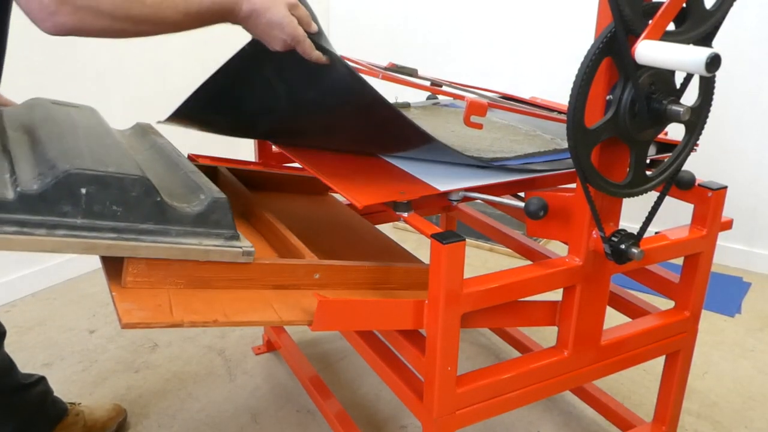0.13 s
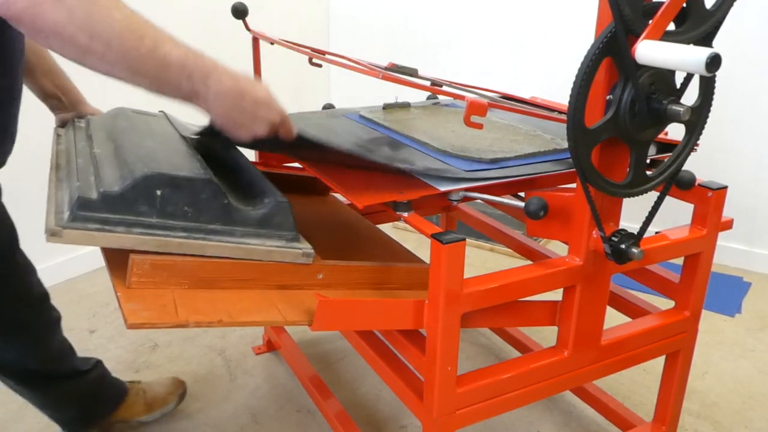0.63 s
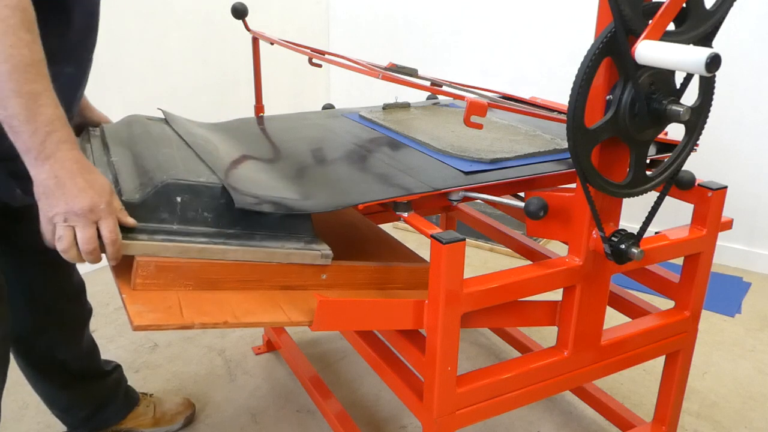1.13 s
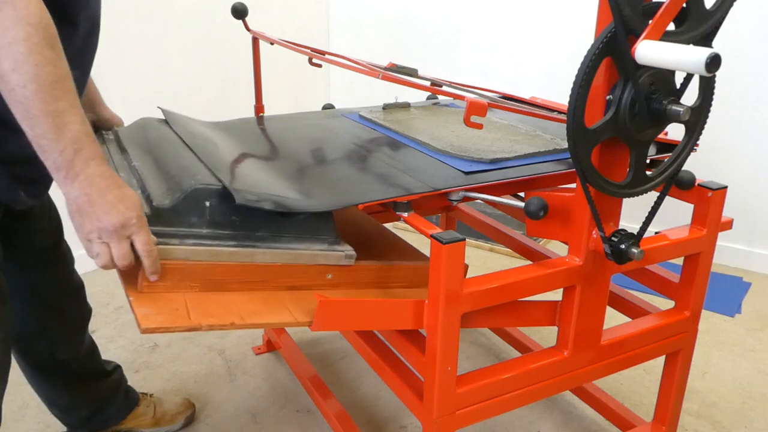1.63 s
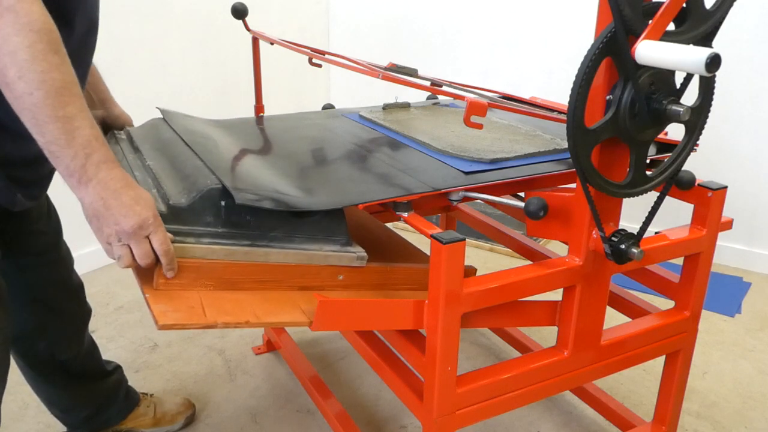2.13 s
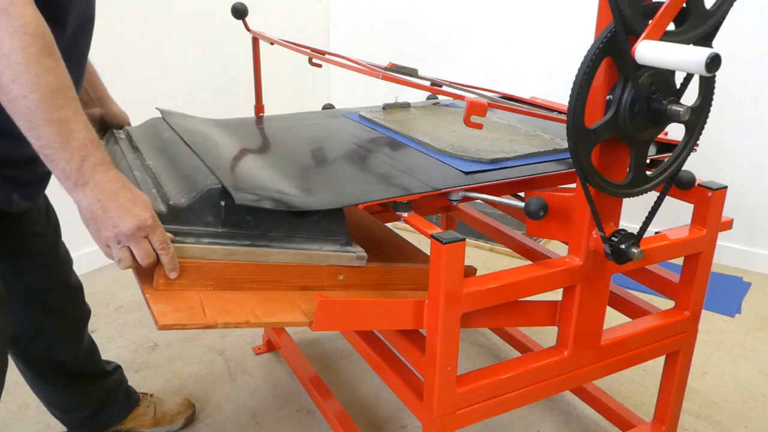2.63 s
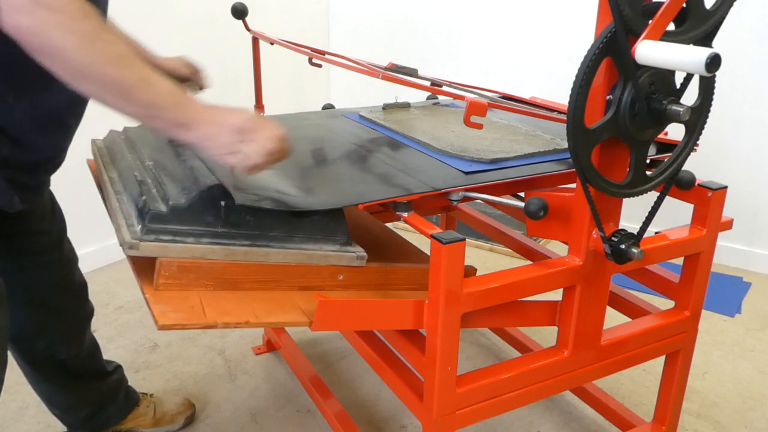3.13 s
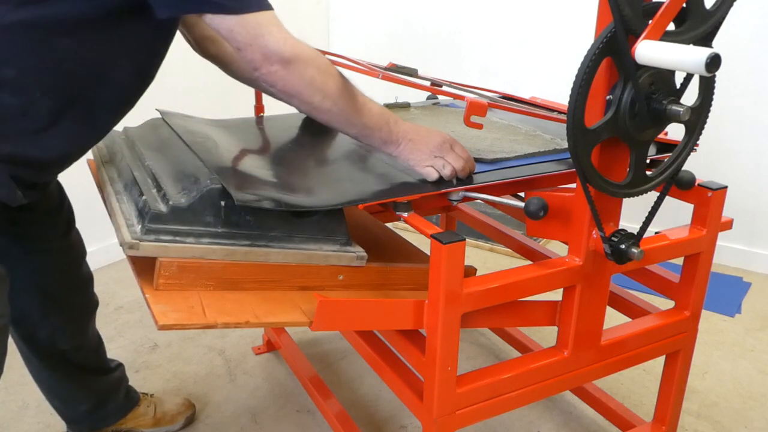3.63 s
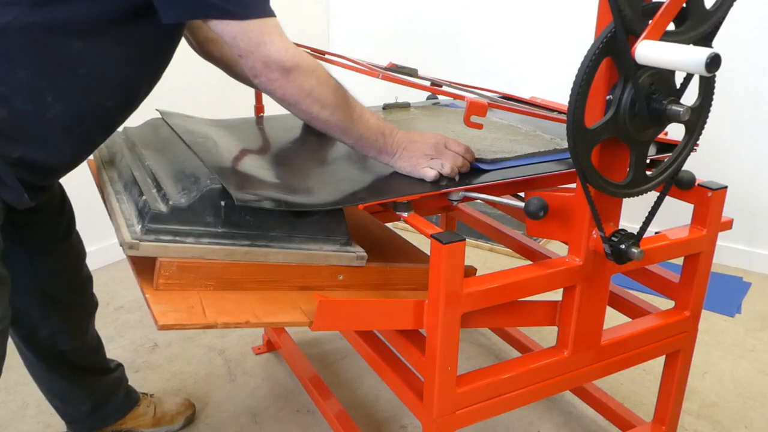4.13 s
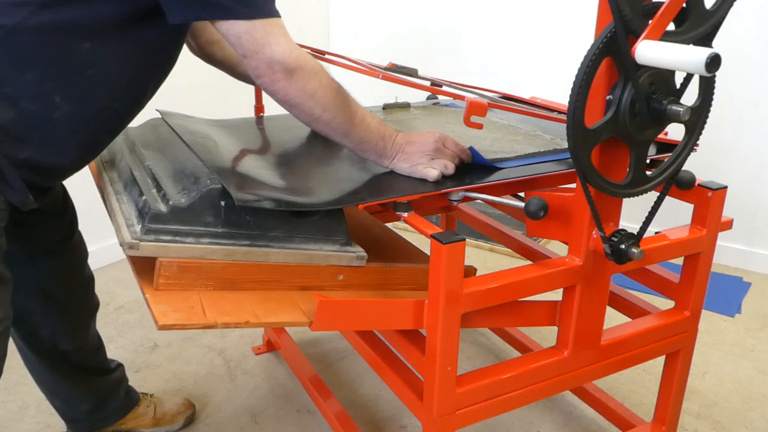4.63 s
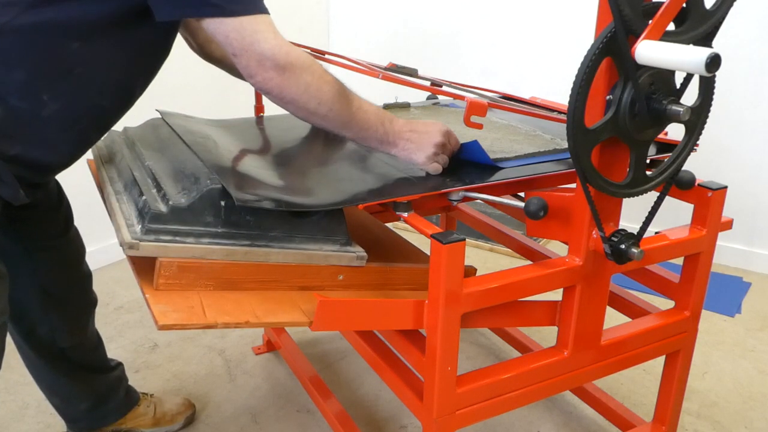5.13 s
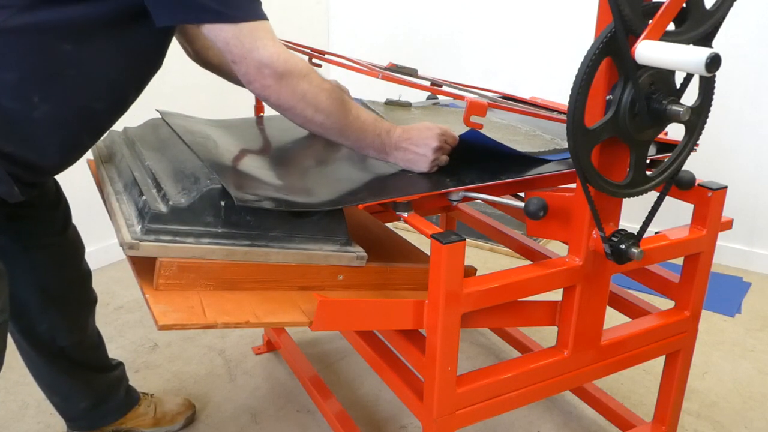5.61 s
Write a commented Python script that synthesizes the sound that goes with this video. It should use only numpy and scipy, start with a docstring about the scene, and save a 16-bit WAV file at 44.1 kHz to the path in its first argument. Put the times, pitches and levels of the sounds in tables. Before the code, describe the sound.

A plastic mould bumps and scrapes over a hollow wooden tray, a sheet slaps down, then after near silence a sticky film crackles as it peels.

```python
"""Plastic mould on a wooden press tray

In a bare workshop, near and slightly left of centre, a mould bumps and drags along a hand press's tray:
stick-slip grains and blows ring tray resonances, and filtered grains make the grit and the sheet's swish.
The sheet slaps and squeaks, fingers tick on it, a rod sings, then a sticky film peels in tiny rung clicks.
Noise tails form the room at two close-set microphones, over a faint, nearly steady hiss.
"""
import sys
import numpy as np
from scipy import signal
from scipy.fft import rfft, irfft
from scipy.io import wavfile
from scipy.ndimage import uniform_filter1d

SR = 44100
rng = np.random.default_rng(int(sys.argv[2]) if len(sys.argv) > 2 else 0)


def decibels_to_gain(level_db):
    """Convert a level in decibels to a linear amplitude gain (20 dB per decade)."""
    exponent = np.asarray(level_db, float) / 20
    return 10 ** exponent


def store_pcm(level_fs):
    """Save levels as 16-bit WAV."""
    pcm = np.round(np.clip(level_fs, -1, 1) * 32767).astype(np.int16)
    wavfile.write(sys.argv[1], SR, np.atleast_2d(pcm).T)


N = 253134  # samples


# Each shove of the mould rumbles for its own length, then fades out quickly; shoves may overlap.
# Levels before sag and mix: start_s, length_s, boards_db, boom_share_db, grit_share_db (relative to boards_db)
SHOVES = [(-.03, 0.19, -24, 4.5, -14.5), (0.157, 0.65, -35, -1, -6.5), (0.34, 0.19, -37.5, -10, -8),
          (0.487, 0.1, -17, 2.5, -9.5), (0.579, 0.089, -26.5, 5.5, -5), (0.725, 0.11, -32.5, 16.5, 2),
          (0.763, 0.055, -21.5, 4, 1.5), (0.821, 0.39, -20, 6.5, -2), (1.076, 0.11, -30, 0, -21),
          (1.21, 0.076, -27.5, -3, -6.5), (1.285, 0.12, -29, 6, -5), (1.393, 0.027, -18.5, -1.5, -4.5),
          (1.426, 0.29, -22.5, -2, -3.5), (1.561, 0.12, -35, 4, -16), (1.718, 0.15, -33.5, 4, -5),
          (1.871, 0.89, -36, 1.5, -5), (2.168, 0.34, -57.5, 14, -8), (2.333, 0.46, -71, 18.5, 1),
          (2.541, 0.31, -58, 3, 7), (2.923, 0.28, -56.5, -9, 1)]


def rumbles(sag_db_s, share_db):
    """Gain of all shoves: quick rise, steady sag, quick fade at the end of each; powers add."""
    rise_s, release_s = 0.0074, 0.009
    t, power = np.arange(N) / SR, 0
    for (start_s, length_s, db, *_), share in zip(SHOVES, share_db):
        rise = (t - start_s) / rise_s
        release = 1 + (start_s + length_s - t) / release_s
        gate = np.clip(np.minimum(rise, release), 0, 1)
        sagging_db = db + share - sag_db_s * np.abs(t - start_s)
        power = power + (gate ** 2 * decibels_to_gain(sagging_db)) ** 2
    return np.sqrt(power)


# Air boom of the hollow tray, close by: pitch_hz, width_hz, level_db (relative)
BOOM = [(184, 11, -13.5), (223.8, 9.3, -7), (288, 20.8, 0.5)]
# Boards of the tray: pitch_hz, width_hz, level_db (relative)
BOARDS = [(330, 37, -19), (409, 45, 3.5), (476, 33, -0.5), (553.4, 84, 1), (655, 80, 3.5), (760, 280, 3.5),
          (890, 27.4, -7), (1115, 600, 1.5), (1487, 203, -23.5)]
# Where the mould lies decides which boom it drives best: time_s, favoured_hz
FAVOURED = [(0, 170), (.2, 246), (.48, 290), (.73, 288), (.87, 285), (.92, 248), (.97, 283), (1.1, 259),
            (1.4, 277), (1.95, 228.6)]


def tray_rumble():
    """Stick and slip of the mould rings the hollow tray and its boards."""
    boom_share_db = np.transpose(SHOVES)[3]
    boom_gain = rumbles(56.5, boom_share_db)
    boards_gain = rumbles(61.5, np.zeros(len(SHOVES)))
    slips = grains(2500, 1.3) * decibels_to_gain(2.9 * walk(40.22))
    favoured_hz = np.interp(np.arange(N) / SR, *np.transpose(FAVOURED))
    hollow = 0
    for mode in BOOM:
        nearness = decibels_to_gain(-np.abs(favoured_hz - mode[0]) / 7)  # 1 dB lost per 7 Hz
        hollow = hollow + nearness * ring(slips, [mode])
    panels = high_pass(locked(ring(slips, BOARDS), 0.98), 2, 240)
    return boom_gain * level(locked(hollow, 0.59), -5.0) + boards_gain * level(panels, -0.73)


# Hard rim of the mould, close by: pitch_hz, width_hz, level_db (relative)
CRACK = [(1194, 220, 1), (2544, 820, -2.5), (3270, 320, -3), (4200, 1600, -5), (6000, 3000, -22)]
# Blows on the tray, levels before filtering: time_s, level_db, crack_share_db (relative to level_db)
KNOCKS = [(0.142, -19.5, -27), (0.4794, -22.5, -3.5), (0.4948, -3, -11.5), (0.511, -15, -17),
          (0.5148, -8, -20), (0.526, -11, -9.5), (0.55, -18, -13.5), (0.7737, -18.5, -1), (0.7839, -12, -1),
          (0.844, -21.5, -17.5), (0.866, -28, 5.5), (0.904, -15, -16.5), (0.928, -18.5, -17),
          (0.944, -11, -19), (1.219, -22, -27.5), (1.267, -15.5, -12), (1.308, -10, -25.5),
          (1.397, -3, -0.5), (1.404, -7, -13), (1.409, -13.5, -15), (1.888, -18.5, -16), (2.22, -37, -12)]


def knocks():
    """The hard rim cracks first, the hollow tray booms after it."""
    lag_s = 0.0015
    time_s, db, crack_share_db = np.transpose(KNOCKS)
    crack_s = time_s + lag_s
    thud = blows(crack_s + lag_s, db, BOOM + BOARDS, 0.00071)
    crack = bursts(crack_s, db + crack_share_db, CRACK, 0.002, touch=6.8)
    return high_pass(thud, 2, 200) + crack


# Strokes of the sheet over the plastic, levels before the mix; rise and fall span 20 dB:
# peak_s, level_db, rise_s, fall_s, grit_share_db (relative to level_db)
STROKES = [(.16, -47, 0.024, 0.049, -1.5), (.29, -45, 0.19, 0.38, 2), (.45, -42.5, 0.31, 0.11, 5),
           (.498, -30, 0.013, 0.036, 8.5), (.62, -29, 0.049, 0.11, -2.5), (.68, -21.5, 0.078, 0.028, -18.5),
           (.75, -35.5, 0.16, 0.059, 2.5), (.87, -50, 0.053, 0.34, 2), (1.08, -50, 0.11, 0.39, 13),
           (1.285, -38.5, 0.035, 0.11, -3.5), (1.335, -32.5, 0.096, 0.07, 3),
           (1.61, -49.5, 0.085, 0.051, -5), (1.76, -50, .12, 0.24, 12), (1.87, -43, 0.36, 0.16, 5),
           (2.21, -56, 0.38, 0.21, -16), (2.975, -49.5, 0.11, 0.084, 2.5)]
# Colour of the sheet's hiss: frequency_hz, gain_db (relative)
SWISH = [(1470, -17), (2500, -6.5), (3660, -8.5), (5690, -10.5), (6690, -14), (8180, -17), (10300, -14),
         (14800, -28.5), (15900, -27.5)]


def sheet_swish():
    """The sheet hisses over the plastic in many small random slips."""
    swish_gain, _ = swells(STROKES)
    hiss = colour(grains(9000, 0.76), SWISH) * decibels_to_gain(0.91 * walk(49.9))
    return swish_gain * level(hiss, -0.81)


# Colour of grit scratching the wood: frequency_hz, gain_db (relative)
GRIT = [(410, -26.5), (700, 2.5), (865, -0.5), (1010, -2), (1440, -2.5), (1710, -6.5), (2940, -14),
        (7000, -36), (9100, -73)]


def wood_grit():
    """Grit scratches under the shoved mould and the stroking sheet; their powers add."""
    grit_share_db = np.transpose(SHOVES)[4]
    _, stroke_gain = swells(STROKES)
    grit_gain = np.hypot(rumbles(41.5, grit_share_db), stroke_gain)
    scratch = colour(grains(3000, 1.55), GRIT) * decibels_to_gain(1.0 * walk(60))
    return grit_gain * level(scratch, -3.5)


# The sheet slaps onto the mould, levels before the bass cut: time_s, level_db
SLAPS = [(0.623, -29), (0.669, -18), (0.6765, -14.5), (0.6797, -7.5), (0.704, -20)]
# Ring of the slapping sheet: pitch_hz, width_hz, level_db (relative)
SHEET = [(2850, 178, -15), (4740, 170, 1), (5700, 350, 8), (5180, 296, -1.5), (9950, 1120, 8.5)]


def sheet_slaps():
    """The falling sheet's contacts rattle in its resonances; thin, without bass."""
    return high_pass(bursts(*np.transpose(SLAPS), SHEET, 0.0014), 3, 1200)


# The sheet's edge squeaks as it slips, levels before roughness: start_s, pitch_hz (at start), length_s, level_db
SQUEAKS = [(0.619, 3106, 0.019, -33.5), (.62, 2456, 0.043, -32), (0.66, 1758, 0.022, -26),
           (0.663, 2816, 0.014, -35.5), (0.673, 1502, 0.034, -25), (0.537, 903, 0.021, -21),
           (0.576, 900, 0.1, -29.5), (0.623, 1810, 0.032, -36), (0.673, 2082, 0.014, -28.5)]


def squeaks():
    """Short, slightly falling tones with a rough edge and a wavering pitch."""
    t, out = np.arange(N) / SR, np.zeros(N)
    rough = decibels_to_gain(2.03 * walk(400))
    waver = 0.5 * walk(250)  # radians
    for start_s, pitch_hz, length_s, db in SQUEAKS:
        u = np.clip((t - start_s) / length_s, 0, 1)
        envelope = np.sqrt(np.abs(np.sin(np.pi * u)) * (u < 1))
        cycles = pitch_hz * length_s * (u - 0.021 * u ** 2)
        out += decibels_to_gain(db) * envelope * rough * np.sin(2 * np.pi * cycles + waver)
    return out


# Fingers tick the taut sheet, levels before the bass cut: time_s, level_db, low_share_db (relative to level_db)
TICKS = [(3.3737, -52, 1.5), (3.5058, -37.5, -7), (3.752, -47.5, -12), (3.835, -22, -8.5), (3.8691, -39, 1),
         (4.0576, -36, -5.5), (4.4676, -60.5, 16.5)]
# Low ring of the taut sheet: pitch_hz, width_hz, level_db (relative)
TICK_LOW = [(2120, 220, 7.8), (1475, 360, 2.4)]
# High ring of the taut sheet: pitch_hz, width_hz, level_db (relative)
TICK_HIGH = [(3040, 2100, -6), (5150, 530, -1.5), (6600, 1960, 0), (10100, 1900, -1), (13900, 1700, -8)]


def finger_ticks():
    """Fingertip contacts rattle in the taut sheet's low and high resonances."""
    time_s, db, low_share_db = np.transpose(TICKS)
    low = bursts(time_s, db + low_share_db, TICK_LOW, 0.003)
    high = bursts(time_s, db, TICK_HIGH, 0.0051)
    return high_pass(low + high, 3, 1200)


# A steel rod of the frame is nudged, levels before the bass cut: time_s, level_db
NUDGES = [(3.738, -54), (3.836, -43), (3.918, -51)]
# Its ring: pitch_hz, width_hz, level_db (relative)
ROD = [(1818, 11.7, 0)]


def singing_rod():
    """Short pushes set off the rod's single, slowly damped resonance."""
    return high_pass(blows(*np.transpose(NUDGES), ROD, 0.00027), 3, 1200)


# Tugs at the film, levels before the mix; rise and fall span 20 dB:
# peak_s, level_db, rise_s, fall_s, low_share_db (relative to level_db)
TUGS = [(4.49, -48.5, 0.025, 0.43, -5), (4.67, -45, 0.0089, 0.2, -2.5), (4.715, -45, 0.075, 0.12, 0),
        (4.8, -53, 0.32, 0.028, -11), (4.89, -57, .15, 0.17, -0.5), (4.97, -49, 0.094, 0.24, -4.5),
        (5.05, -53.5, 0.22, .2, 0), (5.15, -25, 0.043, 0.029, -11.5), (5.22, -30, 0.11, 0.1, -8.5),
        (5.33, -34, 0.18, 0.34, -5), (5.42, -34.5, 0.37, 0.055, -7), (5.49, -44, 0.152, 0.17, -3.5),
        (5.555, -43, 0.26, 0.11, -1.5), (5.67, -47, 0.047, 0.33, -0.5), (5.73, -44, 0.18, .2, 0.5)]
# Colour of the peeling film: frequency_hz, gain_db (relative)
FILM = [(150, -45), (422, -17), (555, -41), (788, -11.5), (1360, -12), (1530, -8.5), (1790, -12.5),
        (2050, -8), (3760, -4.5), (8210, -6.5), (9980, -5), (14700, -10), (15900, -11)]
# The sheet under the film drums along: pitch_hz, width_hz, level_db (relative)
FILM_BODY = [(790, 75, 2.5), (417, 86, 1)]
# Ring of a tiny click: pitch_hz, width_hz, level_db (relative)
SNAP_RING = [(5590, 2800, -3.5), (9970, 1640, -1.5), (13720, 5000, 2.5)]


def film_crackle():
    """Glue lets go in dense tiny clicks over a hiss; each tug brings its own share of lower crackle."""
    high_gain, low_gain = swells(TUGS)
    clicks = level(ring(grains(1100, 1.3), SNAP_RING), -8)
    hiss = level(rng.standard_normal(N) * decibels_to_gain(1.46 * walk(200)), -5)
    film = level(colour(clicks + hiss, FILM), 0)
    high = high_pass(film, 2, 5500)
    drum = level(ring(grains(900, 0.94), FILM_BODY), -23.5)
    return high_gain * level(high, -4.0) + low_gain * (level(film - high, 0.6) + drum)


# A slow pull lets go in a near-regular stutter: start_s, length_s, snaps_per_s, level_db (before spread)
STUTTERS = [(4.471, .075, 95, -36), (4.667, .03, 160, -36), (4.767, .035, 185, -34), (4.876, .03, 130, -34),
            (5.0, .05, 100, -36), (5.108, .03, 220, -30), (5.209, .065, 210, -26), (5.284, .05, 110, -28),
            (5.365, 0.069, 150, -28), (5.452, .04, 52, -41), (5.535, .045, 150, -28),
            (5.687, .055, 170, -25)]


def stutters():
    """Times and levels of the snaps in every stutter, each a little off the regular beat."""
    jitter, spread_db = 0.2, -0.5  # jitter as a share of the spacing
    rows = []
    chances = rng.standard_normal((len(STUTTERS), 2, 16))
    for (start_s, length_s, rate, db), (early_late, loudness) in zip(STUTTERS, chances):
        beats = np.arange(16) + jitter * (early_late - early_late[0])
        end_s = min(start_s + length_s, N / SR)
        for time_s, c in zip(start_s + beats / rate, loudness):
            if time_s < end_s:
                rows.append((time_s, db + spread_db * c))
    return rows


# Single tiny clicks: a faint one among the finger ticks, then let-goes of the glue.
# Levels before the bass cut: time_s, level_db
SNAPS = [(3.413, -47), (4.499, -34.5), (4.551, -27.5), (4.569, -27), (4.664, -30), (4.722, -25.5),
         (4.8072, -28), (4.9577, -25.5), (4.975, -25), (4.99, -27), (5.121, -25), (5.134, -24),
         (5.153, -18.5), (5.178, -28), (5.198, -20), (5.2003, -19), (5.5162, -23), (5.599, -31),
         (5.628, -28), (5.635, -24.5), (5.654, -20), (5.664, -25), (5.672, -23.5), (5.6815, -25)]


def snaps():
    """Single tiny clicks and the stuttered let-goes of the glue ring in the same resonances."""
    time_s, db = np.transpose(SNAPS + stutters())
    return high_pass(bursts(time_s, db, SNAP_RING, 0.00097, touch=2.5), 2, 2200)


# How much left and right differ in the echoes: frequency_hz, gain_db (of the side signal)
WIDTH = [(60, -4.5), (150, -10.5), (300, -17), (700, -11.5), (2000, -10), (8000, -12), (14000, -6)]


def room(x):
    """A mid-range tail shared by two close-set microphones; early echoes reach them differently."""
    dull = signal.sosfilt(signal.butter(1, [680, 8940], "band", fs=SR, output="sos"), x)
    mid = decibels_to_gain(-7) * signal.fftconvolve(dull, decay(0.52, 0.0009))[:N]
    early = signal.fftconvolve(x + mid, decay(0.064, 0))[:N]
    side = colour(early, WIDTH)
    return np.array([mid + side, mid - side])


# Colour of the workshop's hiss: frequency_hz, gain_db (relative)
SHOP = [(25, -18), (90, -18), (220, -7.5), (400, -6.5), (1200, -8.5), (1600, -7), (2050, -3.5),
        (2600, -10.5), (3300, -11), (3900, -15.5), (5200, -15.5), (7500, -20), (14800, -24), (15900, -36.5)]
# How much left and right differ in the hiss: frequency_hz, gain_db (side, on top of the hiss colour)
SHOP_WIDTH = [(60, 10), (500, 8), (1300, 2), (2400, -5.5), (8000, -6.5), (15000, -4.5)]


def shop():
    """Faint background of coloured noise, its middle wandering slightly in level."""
    mid = colour(rng.standard_normal(N), SHOP) * decibels_to_gain(walk(6))
    side = colour(colour(rng.standard_normal(N), SHOP), SHOP_WIDTH)
    return level(np.array([mid + side, mid - side]), -54)


def level(x, db):
    """Scales to an rms level."""
    return x * decibels_to_gain(db) / np.sqrt(np.mean(x ** 2))


def high_pass(x, order, hz):
    """Butterworth bass cut."""
    return signal.sosfilt(signal.butter(order, hz, "high", fs=SR, output="sos"), x)


def colour(x, points):
    """Causal filter through (Hz, dB) points, its response made from the cepstrum."""
    hz, db = np.transpose(points)
    grid = np.maximum(np.fft.rfftfreq(2048, 1 / SR), 1)
    log_gain = np.interp(np.log(grid), np.log(hz), db) * np.log(10) / 20
    cepstrum = irfft(log_gain)
    cepstrum[1:1024] *= 2  # folding the negative times over makes it causal
    cepstrum[1025:] = 0
    return signal.fftconvolve(x, irfft(np.exp(rfft(cepstrum))))[:N]


def ring(x, modes, together=False):
    """Damped resonances (Hz, width, dB); signs alternate unless a blow starts them together."""
    out = 0
    for k, (hz, width, db) in enumerate(modes):
        pole = np.exp((2j * hz - width) * np.pi / SR)
        sign = 1 if together else (-1) ** k
        out = out + sign * decibels_to_gain(db) * signal.lfilter([1], [1, -pole], x).imag
    return out


def locked(x, grip):
    """Slips lock to the ringing they cause, which evens out its swings."""
    swing = np.sqrt(uniform_filter1d(x ** 2, 700) + 1e-12)
    return x / swing ** np.clip(grip, 0, 1)


def grains(rate, spread_db):
    """Random slips, rate per second: many small, a few large."""
    hit = rng.random(N) < rate / SR
    return hit * rng.standard_normal(N) * decibels_to_gain(spread_db * np.minimum(rng.exponential(size=N), 4))


def blows(times, db, modes, push_s):
    """Each blow is a short rough push; the ringing is scaled by the peak that a smooth push gives."""
    size = max(int(push_s * SR), 2)
    shape = np.hanning(size + 2)[1:-1]
    rough = 1 + 0.3 * rng.standard_normal((len(times), 256))
    push = np.zeros(N)
    for time_s, gain, r in zip(times, decibels_to_gain(db), rough):
        i = int(time_s * SR)
        push[i:i + size] += gain * (shape * r[:size])[:N - i]
    smooth = np.zeros(2000)
    smooth[:size] = shape
    return ring(push, modes, True) / np.abs(ring(smooth, modes, True)).max()


def bursts(times, db, modes, rattle_s, touch=5.3):
    """Each touch is a sharp first contact and a brief rattle that dies away in the resonances."""
    t = np.arange(1500) / SR
    rattle = rng.standard_normal((len(times), len(t))) * np.exp(-t / rattle_s)
    rattle[:, 0] = touch  # against the rattle's initial spread of 1
    out = np.zeros(N + len(t))
    for time_s, gain, r in zip(times, decibels_to_gain(db), rattle):
        i = int(time_s * SR)
        out[i:i + len(t)] += gain * r / np.abs(ring(r, modes)).max()
    return ring(out[:N], modes)


def walk(rate):
    """Slow random wander with spread near 1, from rate new values a second."""
    k = int(SR / rate)
    steps = np.repeat(rng.standard_normal(N // k + 1), k)
    return 1.8 * uniform_filter1d(uniform_filter1d(steps, k), k)[:N]


def swells(table):
    """Gains of movements that swell to a peak and fade, and of their second layer; powers add."""
    t, main, second = np.arange(N) / SR, 0, 0
    for peak_s, db, rise_s, fall_s, share_db in table:
        away = np.maximum((peak_s - t) / rise_s, (t - peak_s) / fall_s)
        power = decibels_to_gain(db - 20 * away) ** 2
        main = main + power
        second = second + power * decibels_to_gain(share_db) ** 2
    return np.sqrt(main), np.sqrt(second)


def decay(t60_s, delay_s):
    """A noisy echo tail of unit energy."""
    t = np.arange(int(0.8 * SR)) / SR
    onset = np.clip((t - delay_s) / 0.0015, 0, 1)
    tail = rng.standard_normal(len(t)) * decibels_to_gain(-60 * t / t60_s) * onset
    return tail / np.sqrt(np.sum(tail ** 2))


def scene():
    """Everything happens near the middle, slightly left; the small tray sends out no deep bass."""
    tray = tray_rumble() + knocks() + wood_grit()
    sheet = sheet_swish() + sheet_slaps() + squeaks() + finger_ticks()
    film = film_crackle() + snaps()
    near = high_pass(tray + sheet + singing_rod() + film, 6, 155)
    left_right = decibels_to_gain(np.array([[0.2], [-0.2]]))
    return near * left_right + room(near) + shop()


def roll_off(x):
    """The treble ends steeply here."""
    return signal.sosfilt(signal.butter(12, 16090, fs=SR, output="sos"), x)


def record(dry):
    """The treble is cut steeply above 15750 Hz by an elliptic low-pass."""
    mix = signal.sosfilt(signal.ellip(10, 0.3, 50, 15750, fs=SR, output="sos"), dry)
    return roll_off(mix)


dry = scene()
out = record(dry)
store_pcm(out)
```